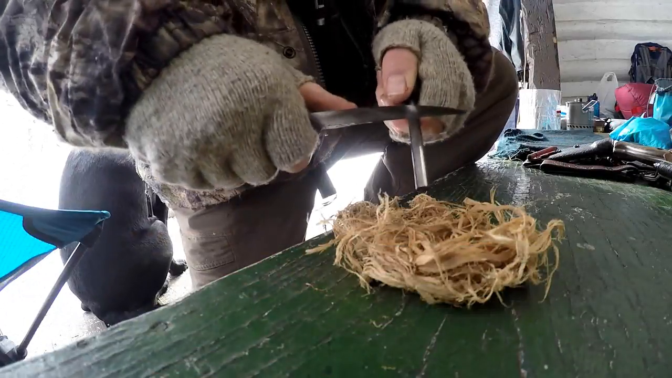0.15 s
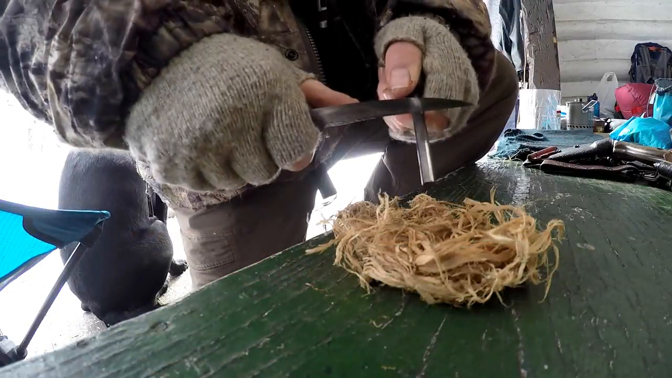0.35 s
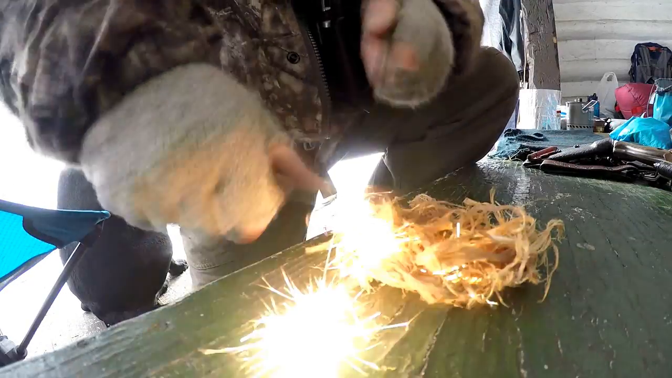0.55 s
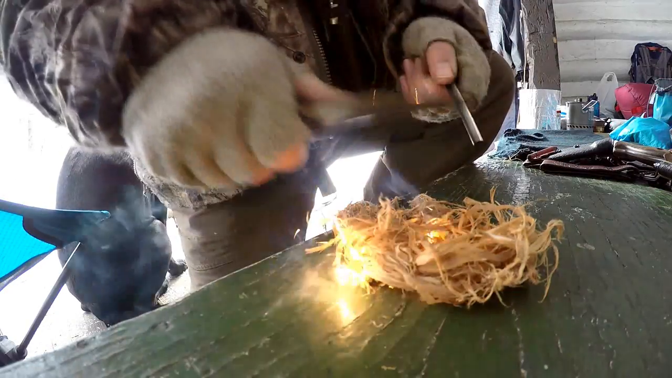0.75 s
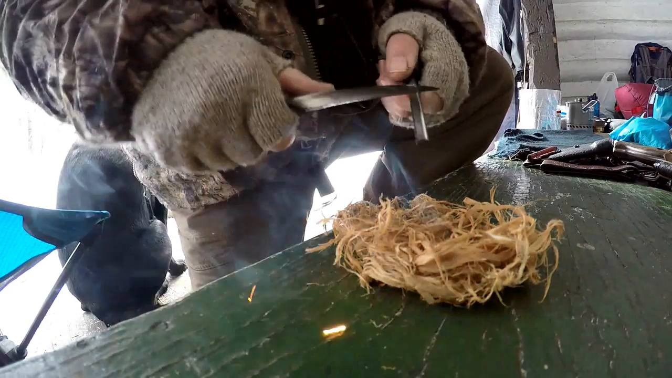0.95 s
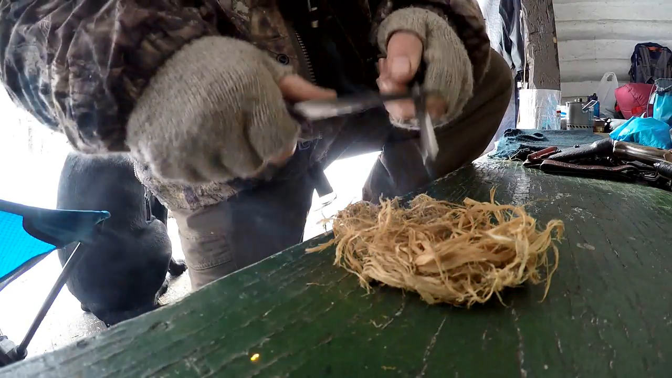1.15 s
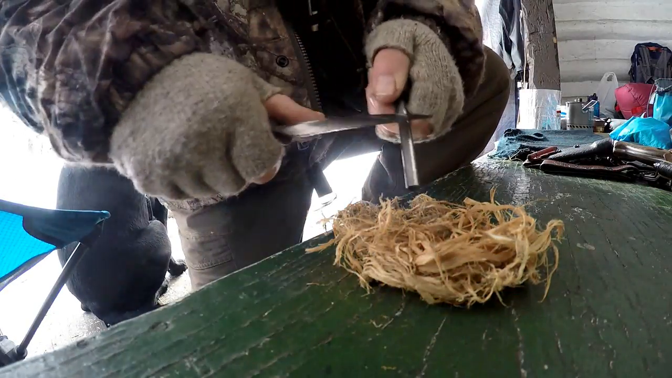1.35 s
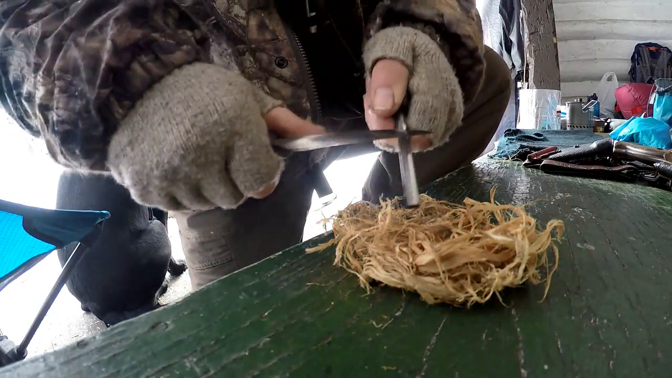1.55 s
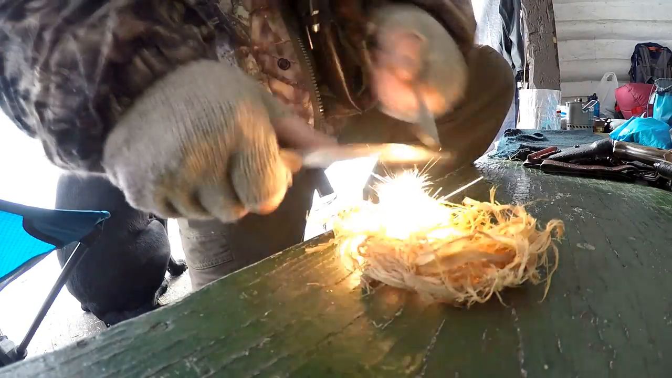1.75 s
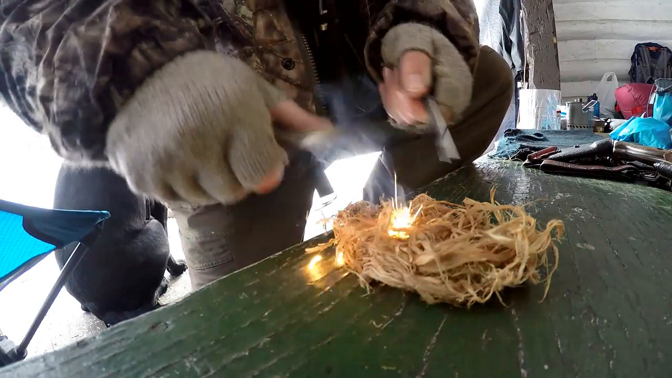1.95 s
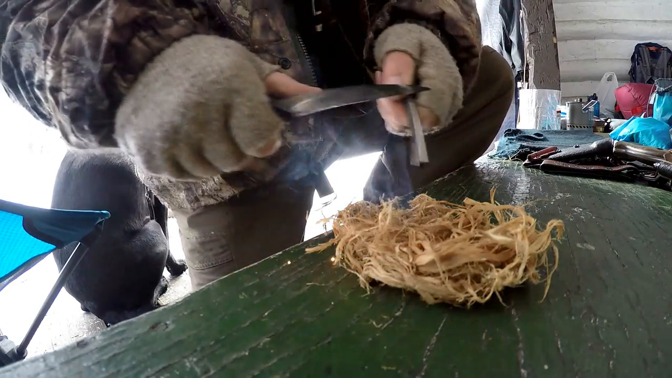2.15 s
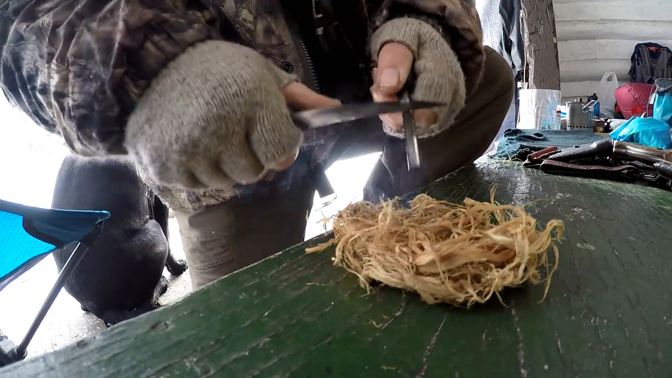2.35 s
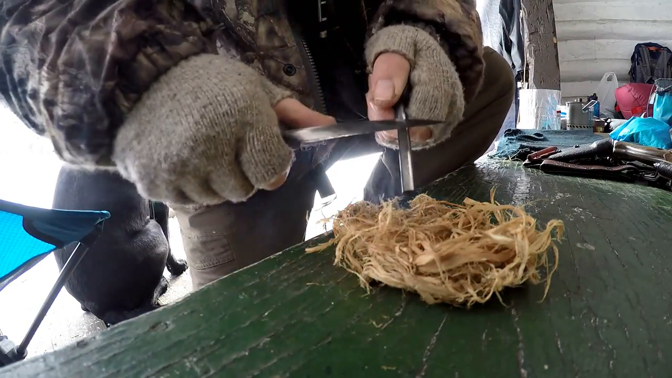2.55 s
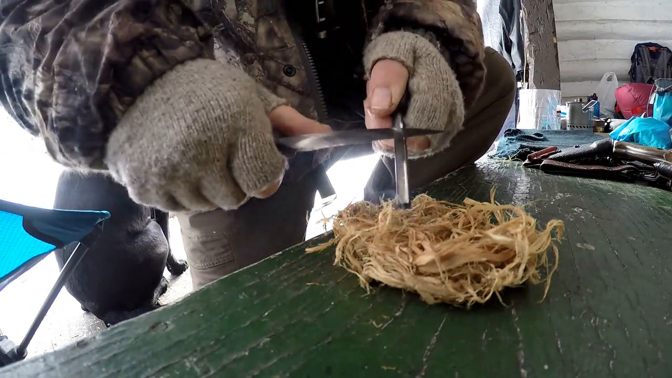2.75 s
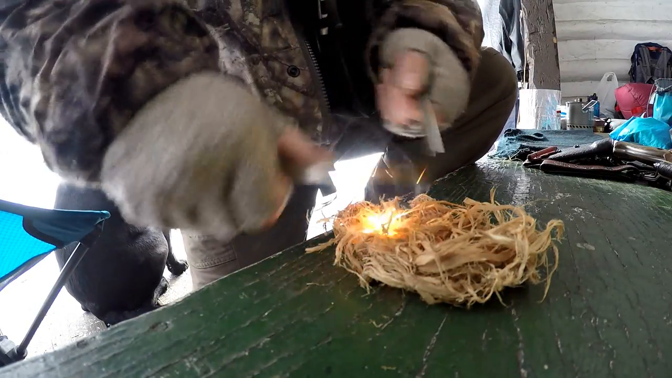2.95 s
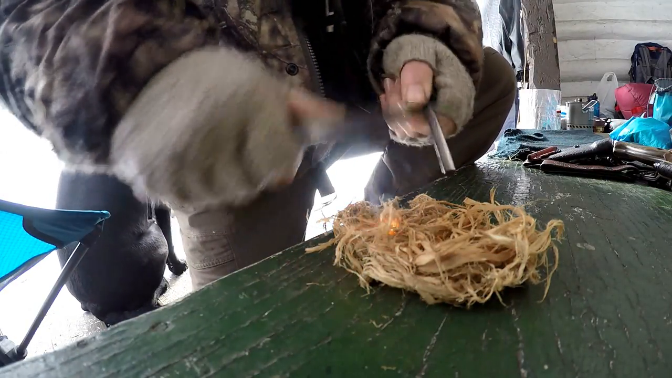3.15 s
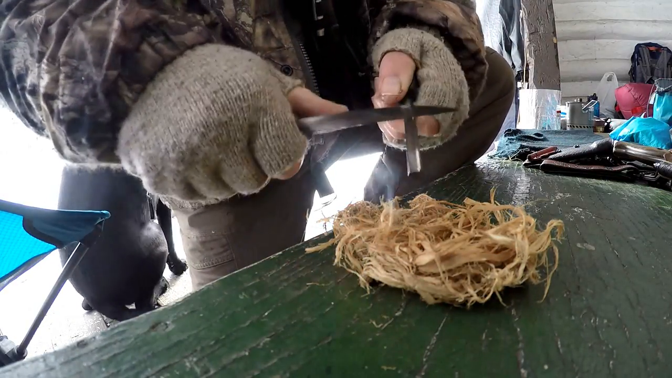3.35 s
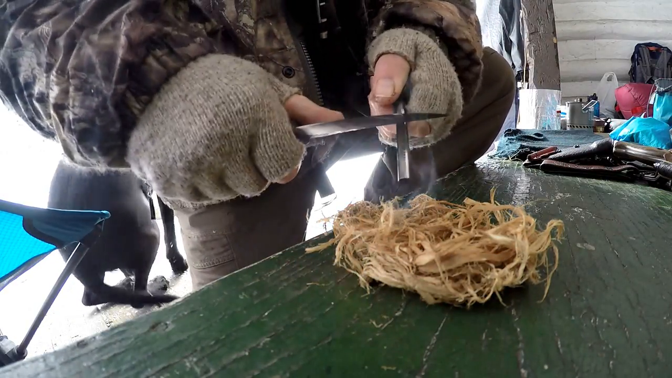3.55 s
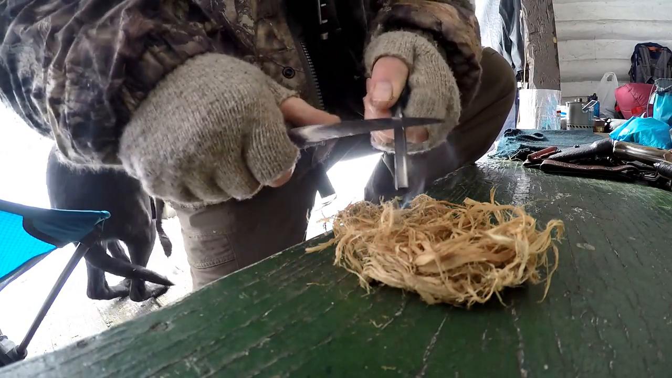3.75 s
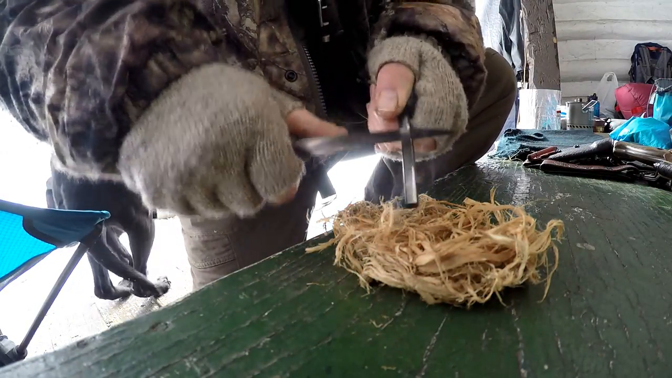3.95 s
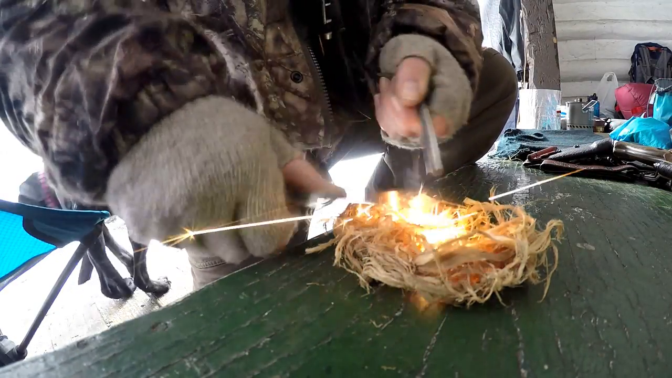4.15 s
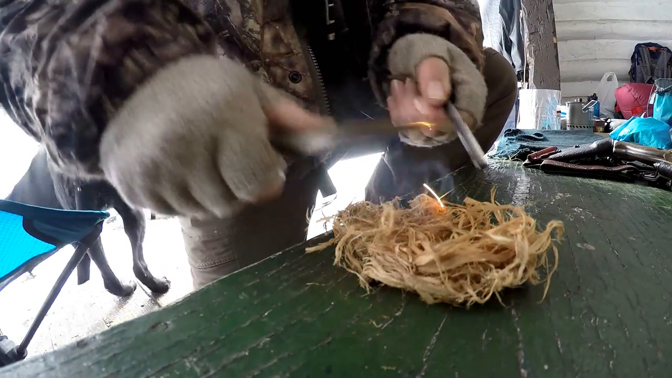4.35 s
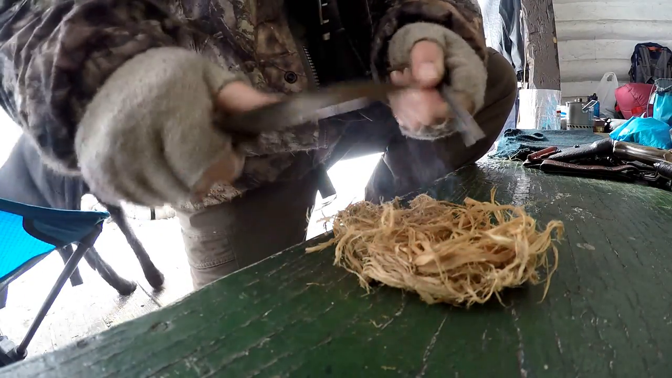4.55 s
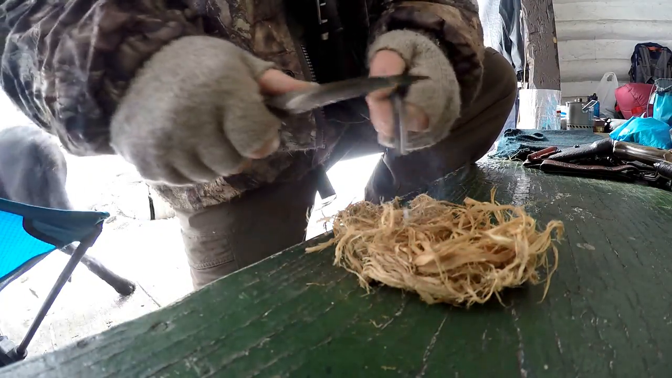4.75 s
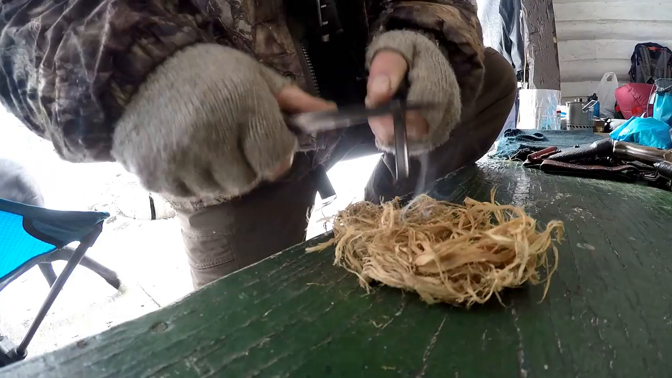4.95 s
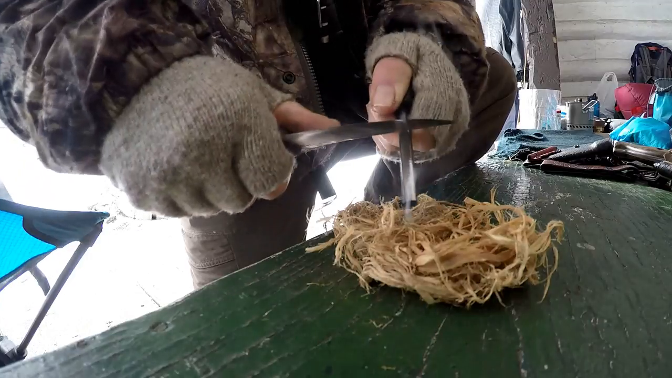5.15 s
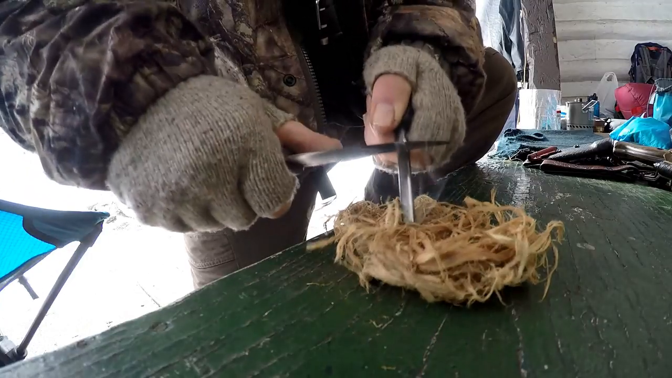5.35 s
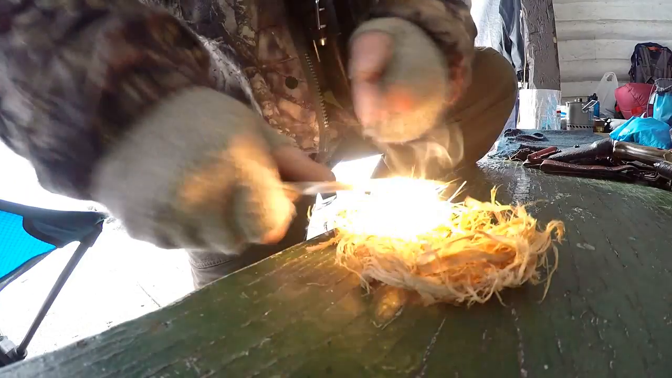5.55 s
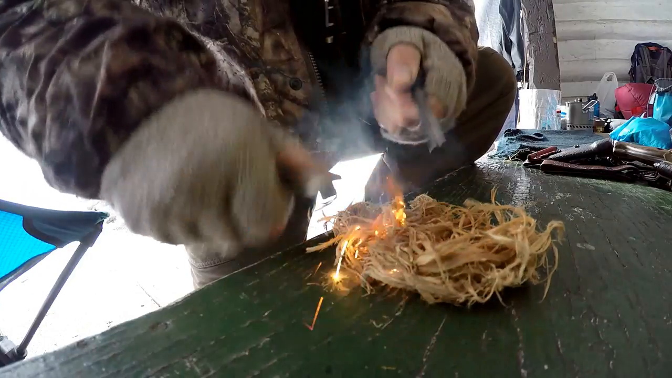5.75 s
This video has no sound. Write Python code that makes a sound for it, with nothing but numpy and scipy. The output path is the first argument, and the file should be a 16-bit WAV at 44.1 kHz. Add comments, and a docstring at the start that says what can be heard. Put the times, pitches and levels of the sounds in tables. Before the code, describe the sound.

Under a porch, close to one microphone, soft distant outdoor rumble and faint recorder hiss with a very thin high whine run throughout. Sleeves rustle faintly. At about 0.5 s a knife skims a ferro rod, bites with a quick chattering squawk that climbs, and rasps harshly until about 0.7 s, bright chips fizzing. Cloth rubs and the blade clicks lightly back around 1.05-1.2 s with a small slide. A second stroke at 1.65 s grates on in snags to 2.0 s; a firm click lands at 2.35 s. The third, at 2.85 s, is broken by little knocks, with clicks and a slide near 3.3 s. The fourth, at 4.0 s, is duller and scratchier, trailing to 4.35 s, followed by a clear click at 4.9 s. The last rips at 5.5 s, ending around 5.75 s with a stronger low air puff. Rings are short and hand-damped, with sparse, quick echoes.

```python
"""Under a porch, at a table with tinder, soft outdoor rumble and faint recorder hiss and whine run throughout.
Sleeves rustle from the start, as coloured noise that follows the arms; at 0.5 s a knife first meets a ferro rod.
Each of five strokes skims as random chips, bites as a run of jolts through steel resonances, then rasps unevenly
while low-band noise puffs from the fist. Then the blade clicks back onto the rod, as short bursts and damped rings,
and at times slides to rest. Sparse random echoes of the knife return from table, body, walls and roof."""
import sys
import numpy as np
from scipy import signal
from scipy.fft import rfft, irfft
from scipy.io import wavfile
from scipy.ndimage import uniform_filter1d, map_coordinates

SR = 44100
rng = np.random.default_rng(int(sys.argv[2]) if len(sys.argv) > 2 else 0)


def store_wav(level_fs):
    """Save 16-bit WAV to argv[1]."""
    pcm = np.round(np.clip(np.atleast_2d(level_fs), -1, 1) * 32767)
    wavfile.write(sys.argv[1], SR, pcm.T.astype(np.int16))


N = 255780
TIME = np.arange(N) / SR  # s


def amp(db):
    """Decibels to pressure gain."""
    return 10 ** (np.asarray(db) / 20)


def unit(x):
    """Scales to an rms of 1 over the whole array."""
    return x / np.sqrt(np.mean(x ** 2) + 1e-20)


def read(points, hz):
    """Joins (f/Hz, value) points on a log-frequency axis."""
    f, value = np.transpose(points)
    return np.interp(np.log(hz + 1), np.log(f), value)


def add(mix, s, sound):
    """Mixes a sound in at time s."""
    part = mix[max(round(s * SR), 0):][:len(sound)]
    part += sound[:len(part)]


def colour(points, modes=(), tilt_db=0, size=4096):
    """Causal impulse response of energy 1: a smooth spectrum, resonances and a tilt in dB per octave."""
    hz = abs(np.fft.fftfreq(size, 1 / SR))
    db = read(points, hz) + tilt_db * np.log2(np.maximum(hz, 300))  # no tilt below 300 Hz
    for centre, width, lift in modes:
        db = db + lift / (1 + (2 * (hz - centre) / width) ** 2)
    # the phase follows from the log magnitude, so nothing sounds before the blow
    spectrum = np.exp(signal.hilbert(np.log(amp(db))).conj())
    response = np.fft.ifft(spectrum).real[:size // 2]
    return response / np.linalg.norm(response)


def through(x, response):
    """Passes a whole track through an impulse response."""
    return signal.oaconvolve(x, response)[:N]


def wander(rate_hz):
    """Random drift of rms 1, in straight lines between rate_hz new values a second."""
    knots = rng.standard_normal(N // 8)
    return unit(np.interp(TIME * rate_hz, np.arange(len(knots)), knots))


def gate(t, length, rise, release):
    """Rises from t = 0, starts to die away once length has passed; all in s."""
    return np.clip(t / rise, 0, 1) * np.exp(-np.maximum(t - length, 0) / release)


# open air beyond the porch, its spectrum: f/Hz, relative level/dB
OUTDOOR_SPECTRUM = [(12, -5), (22, -0.5), (62, 2.5), (95, -10.5), (120, -8.5), (200, -14.5), (290, -20.5),
                    (700, -18.5), (1000, -25), (1300, -30), (3000, -33.5), (4100, -31.5), (8000, -41.5),
                    (15500, -49.5)]


def outdoors(level_db=-52, swell_db=-0.13, swell_hz=4):
    """Distant rumble and faint hiss: shaped noise whose level drifts very slightly."""
    gain = amp(read(OUTDOOR_SPECTRUM, np.fft.rfftfreq(N, 1 / SR)))
    air = irfft(rfft(rng.standard_normal(N)) * gain, N)
    return amp(level_db) * unit(air * amp(swell_db * wander(swell_hz)))


# arms drawing back and resetting: t/s, length/s, relative level/dB
ARM_MOVES = [(0, 0.083, -70), (0.813, .23, -59.5), (1.186, 0.11, -62.5), (2.14, 0.27, -65.5),
             (2.332, 0.18, -64.5), (2.957, 0.41, -64.5), (4.29, 0.52, -65), (4.927, 0.22, -61),
             (5.597, 0.13, -59)]
# grainy upper cloth sound: f/Hz, relative level/dB per Hz
SWISH_SPECTRUM = [(300, -17), (1200, -3.5), (1900, 0.5), (2400, -6), (4000, 0.5), (5600, -7.5), (8000, -14),
                  (15000, -25)]
# soft, dull rubbing below it: f/Hz, relative level/dB per Hz
RUB_SPECTRUM = [(80, -12), (250, -2), (450, 1), (750, -3), (1000, -6.5), (1400, -26), (4000, -26.5)]


def sleeves(rise_s=0.084, release_s=0.071, rest_db=-78, swish_db=-1, rub_db=3,
            flutter_db=0.95, flutter_hz=50, fibre_db=3, fibre_hz=900):
    """Cloth and wool rub as the arms move: fluttering noise, grainy in its upper part."""
    power = amp(rest_db) ** 2 * np.ones(N)
    for s, length, db in ARM_MOVES:
        power += (amp(db) * gate(TIME - s, length, rise_s, release_s)) ** 2
    motion = np.sqrt(power)
    flutter = amp(flutter_db * wander(flutter_hz))
    fibres = unit(flutter * rng.standard_normal(N) * amp(fibre_db * wander(fibre_hz)))
    swish = through(fibres * motion, colour(SWISH_SPECTRUM))
    cloth = unit(flutter * rng.standard_normal(N))
    rub = through(cloth * motion, colour(RUB_SPECTRUM))
    return amp(swish_db) * swish + amp(rub_db) * rub


# five strokes, each a light skim and then a rasp down the rod: t/s, skim length/s, relative skim level/dB,
# wait until the rasp/s, rasp length/s, relative rasp level/dB, relative level of the stopping puff/dB
STROKES = [(0.507, .048, -39, .071, 0.079, -34.5, -44), (1.66, .066, -38.5, 0.069, 0.079, -39, -46),
           (2.845, 0.047, -39.5, 0.086, 0.039, -43.5, -45), (4.007, .076, -42.5, 0.077, 0.091, -61, -43),
           (5.5, 0.056, -40, 0.068, 0.121, -43.5, -29)]
# edge snagging, swelling to a peak and letting go: peak t/s, swell/s, relative level/dB, depth of cut/dB
SNAGS = [(0.582, 0.0014, -28.5, 2), (0.611, 0.0079, -25.5, -16), (0.661, 0.005, -30, 4),
         (0.700, 0.0013, -32.5, -11), (1.773, 0.0036, -29, -12), (1.801, 0.0037, -31, 0.5),
         (1.866, 0.0094, -37, 4.5), (1.96, .002, -47, 14.5), (2.001, 0.0059, -33, -4),
         (2.970, 0.0044, -34, 3.5), (3.054, 0.0012, -42, -3), (3.1, 0.01, -36, -0.5),
         (4.111, 0.0088, -37.5, 3), (4.151, 0.0055, -37, 8.5), (4.206, 0.019, -41.5, 8),
         (4.260, 0.0018, -49, 11), (4.296, 0.0086, -37, 2), (4.344, 0.005, -47.5, 8),
         (5.599, 0.024, -35, 4.5), (5.703, 0.0069, -30.5, 2), (5.761, .008, -47.5, 7)]
# blade landing on the rod again and sliding to rest: t/s, relative level/dB, depth of cut/dB
SLIDES = [(1.19, -41.5, 2), (2.297, -47, -10), (3.266, -41, 3)]


def pulls(thin_db=-23, deep_db=4.5, dig_s=0.054, trail_db=-16, trail_s=0.092, let_go=0.99):
    """Every contact of edge and rod as (t/s, force over time, depth of cut/dB); depth sets body and sparks."""
    t = np.arange(SR // 2) / SR
    digging = np.interp(t, [0, dig_s], [thin_db, deep_db])  # the cut deepens as the edge digs in
    for s, skim_s, skim_db, wait, rasp_s, rasp_db, _ in STROKES:
        yield s, amp(skim_db) * gate(t, skim_s, 0.012, 0.011), digging
        rasp = gate(t, rasp_s, 0.017, 0.016)
        trail = amp(trail_db) * gate(t, rasp_s, 0.017, trail_s)  # the last chips trail off
        yield s + wait, amp(rasp_db) * np.hypot(rasp, trail), deep_db
    from_peak = t - t.mean()
    for s, swell, db, depth_db in SNAGS:
        # let_go is the fall time as a share of the swell
        snag = np.exp(-np.maximum(-from_peak, from_peak / let_go) / swell)
        yield s - t.mean(), amp(db) * snag, depth_db
    for s, db, depth_db in SLIDES:
        yield s, amp(db) * gate(t, 0.0033, 0.004, 0.021), depth_db


def travel(x, echo=0.45, delay_s=0.00071, drift=0.227, drift_hz=22):
    """Waves return from the rod's end; the delay drifts as the edge moves, so resonances shift."""
    late = delay_s * np.exp(drift * wander(drift_hz))
    returned = map_coordinates(x, [(TIME - late) * SR], order=3)
    return (x - echo * returned) / np.sqrt(1 + echo ** 2)


# resonances of the hand-held knife and rod, shared by rasps, bites and knocks: f/Hz, width/Hz, lift/dB
STEEL_MODES = [(1462, 480, 15.5), (2097, 320, 11), (2844, 410, 12.5), (3960, 395, 10.5), (4500, 500, 8.5),
               (5290, 620, 6.5), (6180, 380, 4.5), (7020, 1800, 3.5), (10100, 570, 5), (12700, 790, 4)]
# colour of the fine chips, under the resonances: f/Hz, relative level/dB per Hz
GRIT_SPECTRUM = [(100, -15), (550, -5.5), (900, 5.5), (1250, -7), (2200, -4), (3400, 1), (5000, 1),
                 (8400, 1.5), (11500, 2), (13500, 0), (16500, -12)]
# low colour of the shaken knife, under the resonances: f/Hz, relative level/dB per Hz
BODY_SPECTRUM = [(25, 9), (70, 11.5), (210, 5.5), (330, 8), (500, 9), (740, 10.5), (980, 4.5), (1170, -13),
                 (2500, -14), (6000, -13), (15000, -75)]
# fizz of burning chips: f/Hz, relative level/dB per Hz
SPARK_SPECTRUM = [(1000, -22), (6000, -7), (10000, -16), (14000, -9), (16500, 12)]


def rasps(chips_per_s=8000, spread_db=2.5, slip_db=2.0, slip_hz=450,
          grit_db=1.5, body_db=-1.68, spark_db=-11):
    """The edge tears tiny chips off the rod in uneven slips; a deep cut also shakes the knife and sprays sparks."""
    force_power, depth_power = np.zeros(N), np.zeros(N)
    for s, pull, depth_db in pulls():
        add(force_power, s, pull ** 2)
        add(depth_power, s, (pull * amp(depth_db)) ** 2)
    sizes = amp(spread_db * np.minimum(rng.exponential(1, (3, N)), 3))
    struck = rng.random((3, N)) < chips_per_s / SR
    chips = sizes * rng.choice([-1, 1], (3, N)) * struck
    fine, coarse, burning = unit(chips * amp(slip_db * wander(slip_hz)))
    grit = travel(through(fine * np.sqrt(force_power), colour(GRIT_SPECTRUM, STEEL_MODES)))
    body = through(coarse * np.sqrt(depth_power), colour(BODY_SPECTRUM, STEEL_MODES))
    fizz = through(burning * np.sqrt(depth_power), colour(SPARK_SPECTRUM))
    return amp(grit_db) * grit + amp(body_db) * body + amp(spark_db) * fizz


# edge digging in, once in each stroke: t/s, length/s, relative level/dB, mid slip rate f/Hz, tilt/dB per octave
BITES = [(0.534, 0.013, -27.5, 1200, 5), (1.684, 0.0075, -27.5, 1010, -1), (2.872, 0.013, -30, 960, -2),
         (4.043, 0.011, -34, 850, -3.5), (5.529, .0095, -27, 1400, 2.5)]
# colour of the chatter, under the resonances: f/Hz, relative level/dB per Hz
CHATTER_SPECTRUM = [(100, -47), (300, -7.5), (460, 2), (630, -26), (800, 14), (1000, 4), (1280, -11.5),
                    (1850, -2), (2400, -13), (4000, -14), (7000, -26), (15000, -39)]


def bites(jitter=0.087, climb_per_s=9, rough=0.72, rise=0.0042, release=0.0029, level_db=1.0,
          squawk_db=-3, from_ratio=0.892, to_ratio=1.4, waver=0.24):
    """Stick and slip: an uneven, quickening run of jolts rings the steel, with a squawk that climbs."""
    out, t = np.zeros(N), np.arange(SR // 20) / SR
    # a weaker judder of 16 ms leads into each bite
    judders = [(s - 0.016, 0.016, db - 13.5, 878, -2.5) for s, _, db, _, _ in BITES]
    for s, length, db, slip_hz, tilt_db in judders + BITES:
        steps, sizes = rng.standard_normal((2, 80))
        speed_hz = slip_hz * np.exp(climb_per_s * (np.arange(len(steps)) / slip_hz - length / 2))
        at = np.cumsum(np.exp(jitter * steps) / speed_hz)
        jolts = np.bincount((at * SR).astype(int), np.exp(rough * sizes), len(t))[:len(t)]
        drive = unit(jolts - jolts.mean()) + rough * rng.standard_normal(len(t))
        grip = gate(t, length, rise, release)
        chatter = signal.fftconvolve(drive * grip, colour(CHATTER_SPECTRUM, STEEL_MODES, tilt_db))
        chatter *= np.linalg.norm(grip) / np.linalg.norm(chatter)
        add(out, s, amp(db + level_db) * chatter)
        # the free length of rod shortens, so its squawk climbs; a dull contact excites it less
        unsteady = np.exp(waver * unit(uniform_filter1d(rng.standard_normal(len(t)), size=20)))
        squawk_hz = slip_hz * np.interp(t, [0, length], [from_ratio, to_ratio]) * unsteady
        squawk = unit(np.sin(2 * np.pi * np.cumsum(squawk_hz) / SR))
        add(out, s, amp(db + squawk_db + 2 * min(tilt_db, 0)) * grip * squawk)
    return out


def puffs(low_hz=33, high_hz=108, level_db=-3.0, push_db=-38, push_s=0.02, brake_s=0.03, fade_s=0.06):
    """The fist shoves air as each rasp starts and stops: low eddies as band-limited noise."""
    power = np.zeros(N)
    for s, _, _, wait, rasp_s, _, stop_db in STROKES:
        rasp_start = s + wait
        power += amp(push_db) ** 2 * np.exp(-((TIME - rasp_start) / push_s) ** 2)
        braking = TIME - (rasp_start + rasp_s - brake_s)
        power += (amp(stop_db) * gate(braking, brake_s, brake_s, fade_s)) ** 2
    band = signal.butter(2, [low_hz, high_hz], "band", fs=SR, output="sos")
    eddies = signal.sosfilt(band, rng.standard_normal(N))
    return amp(level_db) * np.sqrt(power) * unit(eddies)


# blade knocking on the rod: t/s, relative level/dB, tilt/dB per octave, ring of the touched spot f/Hz,
# ring level against the knock's relative level/dB
KNOCKS = [(0.835, -54, 5.5, 4000, -27), (1.054, -46.5, -1.5, 3880, 4), (1.198, -63.5, -9, 8140, 23),
          (2.340, -31, 3, 4380, 2), (2.349, -38, 9, 4160, -10), (2.902, -36.5, 1.5, 5640, 5.5),
          (2.942, -38.5, -14.5, 597, 1), (3.26, -38, 2, 4100, -21), (3.347, -33.5, 1.5, 5460, -5),
          (4.332, -42.5, 0.5, 3950, -7), (4.875, -33, 2, 4110, 5), (5.019, -54, -11, 1480, 0),
          (5.378, -64, 11, 455, 17)]
# colour of the click, under the resonances: f/Hz, relative level/dB per Hz
CLACK_SPECTRUM = [(100, -13.5), (380, 11), (570, 5), (780, 18), (1050, 3.5), (1450, -3.5), (2200, -6),
                  (4200, -4), (6100, -6), (7300, -12), (12500, -13), (15500, -31)]
# partials of a touched spot: ratio to its f, relative level/dB
SPOT_PARTIALS = [(.87, -9), (1, 6.5), (1.11, -23), (1.31, -7.5)]


def knocks(contact_s=0.0027, crunch=1.0, ring_t60_s=0.016, clack_db=24.5, ring_db=-1):
    """Steel meets rod: a click with a brief crunch, and a ring that the hands damp quickly."""
    out, t = np.zeros(N), np.arange(SR // 12) / SR
    damping = np.exp(-np.log(1000) * t / ring_t60_s)
    for s, db, tilt_db, spot_hz, spot_db in KNOCKS:
        blow = crunch * rng.standard_normal(len(t)) * np.exp(-t / contact_s)
        blow[0] += 1
        clack = signal.fftconvolve(blow, colour(CLACK_SPECTRUM, STEEL_MODES, tilt_db))
        add(out, s, amp(db + clack_db) * clack / np.linalg.norm(clack))
        ring = sum(amp(partial_db) * np.sin(2 * np.pi * ratio * spot_hz * t)
                   for ratio, partial_db in SPOT_PARTIALS)
        add(out, s, amp(db + spot_db + ring_db) * ring * damping)
    return out


# how long walls and roof hold the sound: f/Hz, t60/s
PORCH_T60 = [(150, 0.76), (800, 0.079), (4000, 0.21), (9000, 0.084), (15000, 0.032)]


def porch(x, near_db=-13, near_t60_s=0.2, tail_db=-19, delay_s=0.00492):
    """Sparse reflections from table and body, and a fainter tail from walls and roof that decays by frequency."""
    t = np.arange(SR // 2) / SR
    # no echo before 4.92 ms, a path about 1.7 m longer than the direct one
    arrivals = (rng.random((2, len(t))) < .12) * (t > delay_s)
    near, far = rng.standard_normal((2, len(t))) * arrivals
    near = near * np.exp(-np.log(1000) * t / near_t60_s)
    hz, age, z = signal.stft(far, SR, nperseg=256)
    decay = np.exp(-np.log(1000) * age / read(PORCH_T60, hz)[:, None])
    far = signal.istft(z * decay, SR, nperseg=256)[1][:len(t)]
    near_part = amp(near_db) * near / np.linalg.norm(near)
    far_part = amp(tail_db) * far / np.linalg.norm(far)
    return through(x, near_part + far_part)


def scene():
    """Open air, moving arms, and the knife on the rod with its reflections, in one channel."""
    surroundings = outdoors() + sleeves()
    knife = rasps() + bites() + knocks()
    return (surroundings + knife + puffs() + porch(knife))[None]


def record(dry, hiss_db=-76, whine_hz=14230, whine_db=-90, edge_hz=15750):
    """The recorder adds its own faint hiss and whine, then cuts everything above edge_hz."""
    hiss = amp(hiss_db) * rng.standard_normal(N)
    whine = amp(whine_db) * unit(np.sin(2 * np.pi * whine_hz * TIME))
    lowpass = signal.firwin(401, edge_hz, window=("kaiser", 9), fs=SR)
    return signal.oaconvolve(dry + hiss + whine, lowpass[None], "same")


dry = scene()
out = record(dry)
store_wav(out)
```